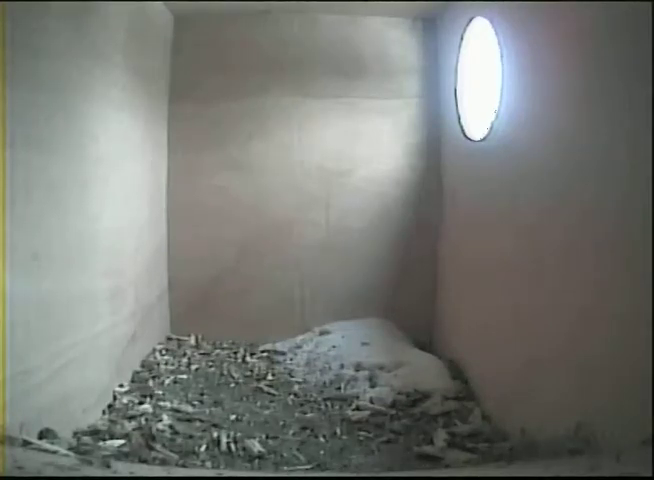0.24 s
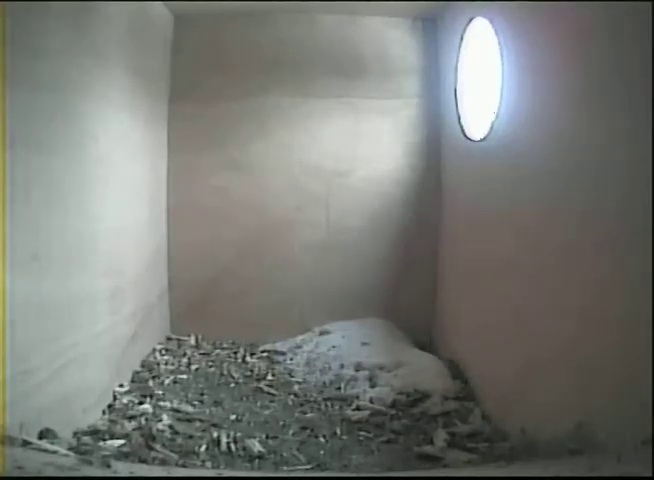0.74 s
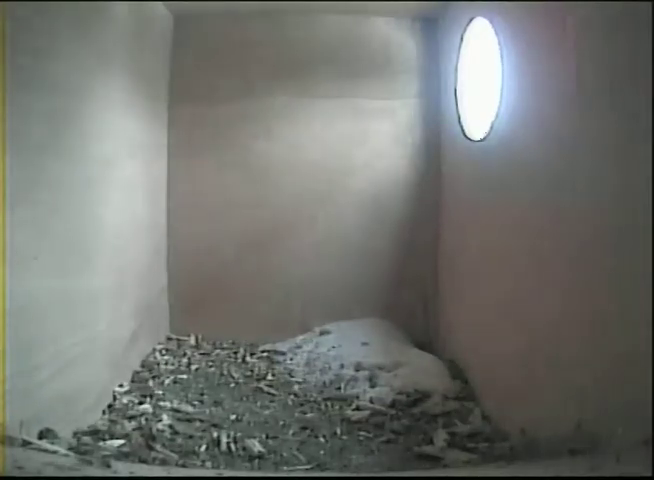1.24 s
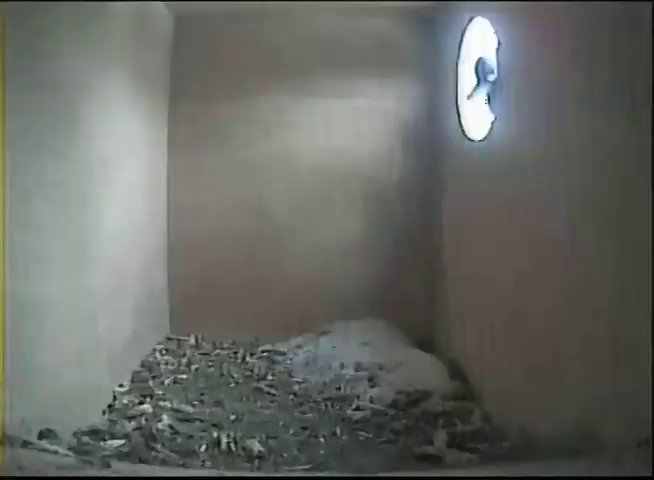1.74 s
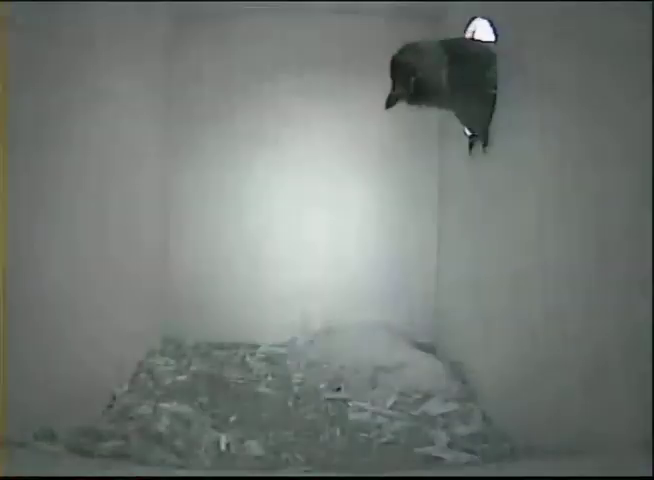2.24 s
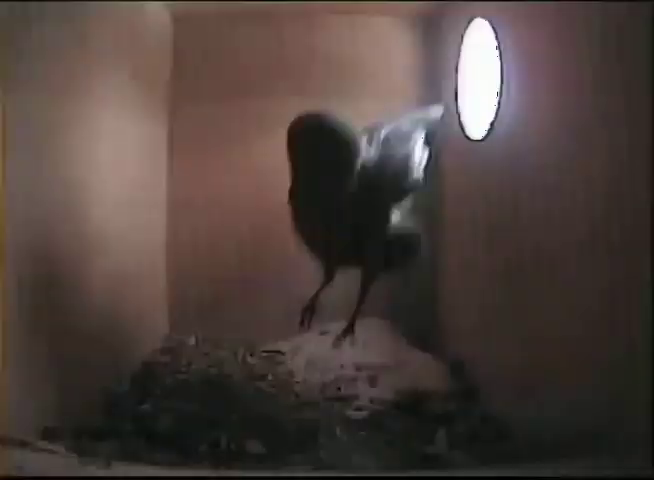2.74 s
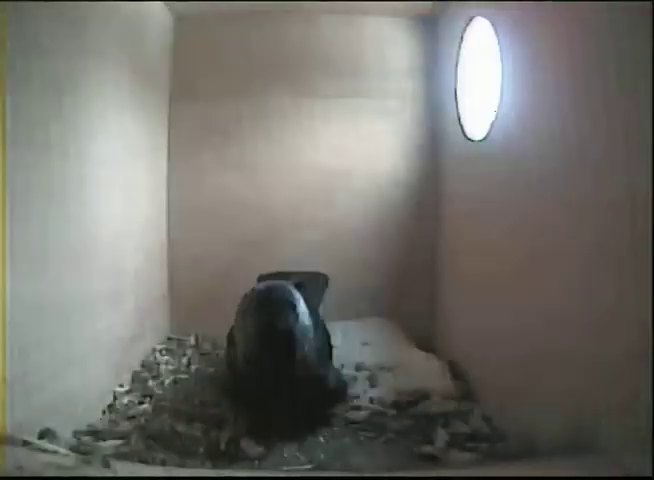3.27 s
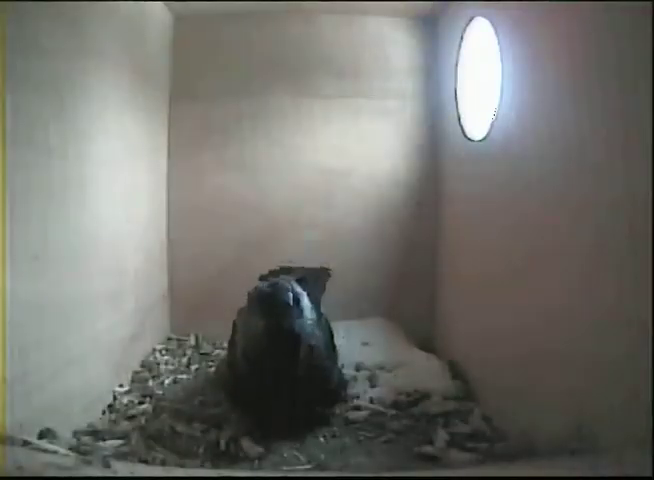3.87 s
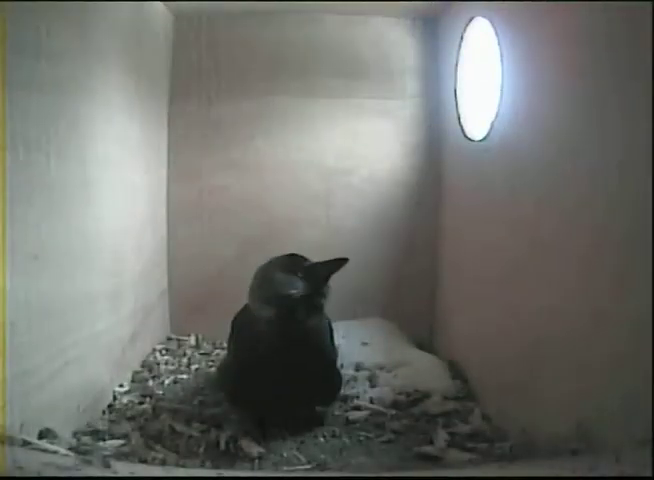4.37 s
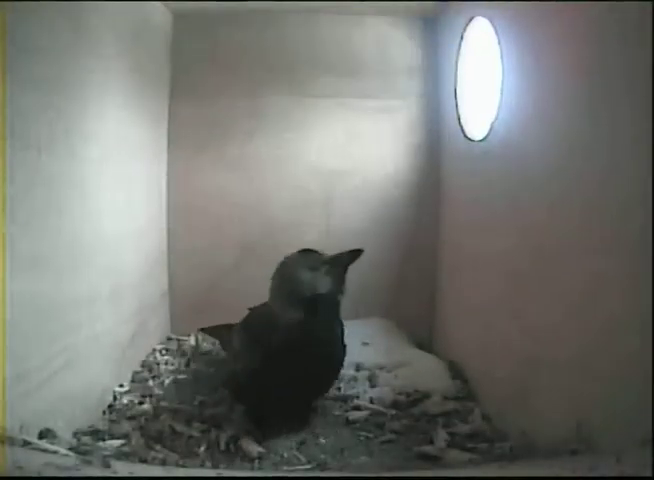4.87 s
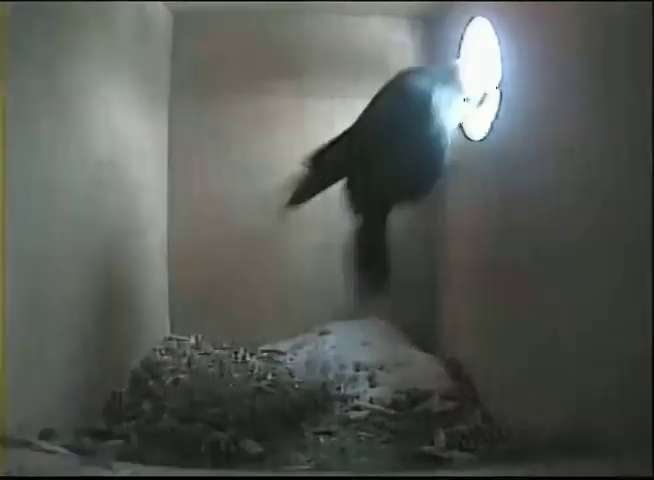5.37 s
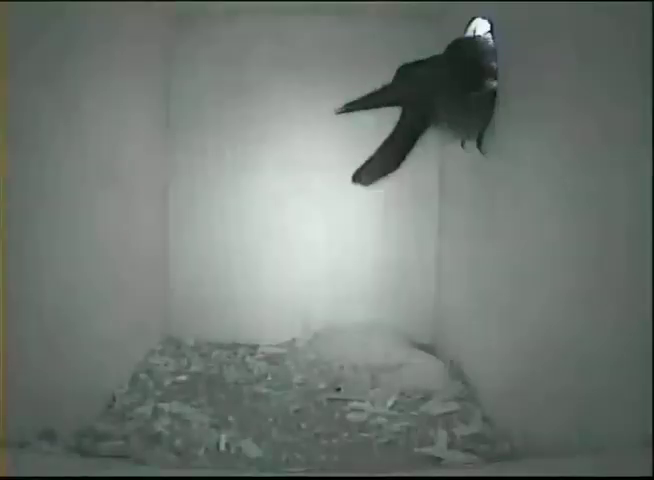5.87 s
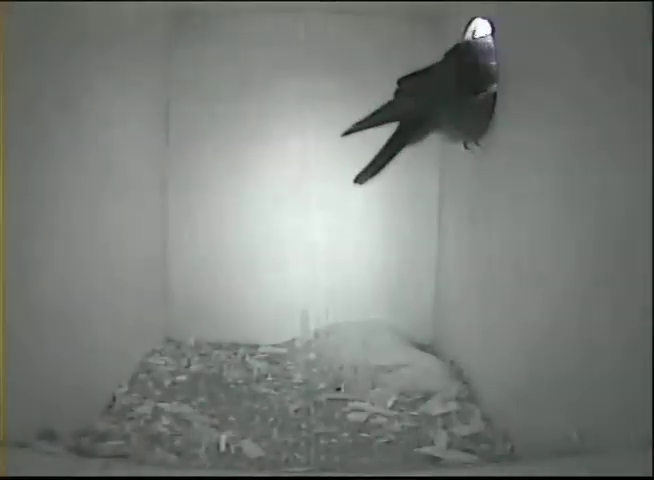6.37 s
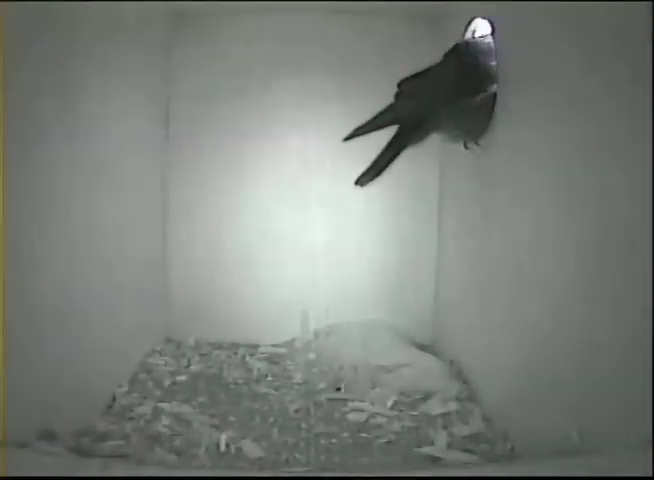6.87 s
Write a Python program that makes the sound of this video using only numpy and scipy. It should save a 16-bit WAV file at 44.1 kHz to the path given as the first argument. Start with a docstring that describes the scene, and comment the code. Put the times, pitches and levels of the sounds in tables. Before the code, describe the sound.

Heard up close from inside a small wooden nest box, a single sharp jackdaw call comes from outside. Claws scratch and tap on the wood as the bird squeezes in and lands with a soft thud. The sound cuts out briefly, then dry litter crackles and the boards knock more loudly. A short flap and scrabble lead to one harsh call and two softer ones, above a faint low rumble.

```python
"""A jackdaw at a wooden nest box, heard from inside. Over faint hiss and hum, a draught makes the box
boom like a bottle. The bird gives one sharp call outside, then claws through the hole, knocking the
boards and brushing the walls. It drops onto the litter with a jolt of air and shuffles about; the
sound cuts out for half a second. It flaps back up to the hole and calls three more times, once
harshly and twice softly."""
import sys
import numpy as np
from scipy import signal
from scipy.fft import rfft, irfft, next_fast_len
from scipy.io import wavfile
from scipy.ndimage import uniform_filter1d, map_coordinates

SR = 44100
rng = np.random.default_rng(int(sys.argv[2]) if len(sys.argv) > 2 else 0)


def output_pcm(signal):
    """Save a mono or channel-first signal as 16-bit PCM at the path in sys.argv[1].

    Samples are clipped to [-1, 1] before scaling.
    """
    pcm = np.clip(np.atleast_2d(signal).T, -1, 1) * 32767
    wavfile.write(sys.argv[1], SR, np.round(pcm).astype(np.int16))


N = 313551
TIME = np.arange(N) / SR


def amp(db):
    """Decibels to gain."""
    return 10 ** (np.asarray(db) / 20)


def unit(x):
    """Scale to rms 1."""
    return x / np.sqrt(np.mean(x ** 2) + 1e-20)


def crest(x):
    """Scale the loudest few milliseconds to rms 1."""
    return x / np.sqrt(uniform_filter1d(x ** 2, size=300).max() + 1e-20)


def along(points, hz):
    """Read (Hz, value) points on a log axis."""
    f, v = np.transpose(points)
    return np.interp(np.log(hz + 1), np.log(f + 1), v)


def curves(rows, t=TIME):
    """Breakpoint envelopes, one for each column after the time."""
    s, *cols = np.transpose(rows)
    return [np.interp(t, s, c) for c in cols]


def wobble(rate, size=N):
    """Smooth random modulation, rate knots a second."""
    knots = rng.standard_normal(int(size * rate / SR) + 4)
    return map_coordinates(knots, [np.arange(size) * rate / SR])


def grains(rate, spread_db, size=N):
    """Tiny random snaps, rate a second, of rms 1."""
    chance, sign, strength = rng.random(size), rng.standard_normal(size), rng.standard_normal(size)
    return unit((chance < rate / SR) * sign * amp(spread_db * np.clip(strength, -2, 2)))


def add(track, s, x):
    """Mix x into the track at time s."""
    part = track[round(s * SR):][:len(x)]
    part += x[:len(part)]


def eq(x, spectrum):
    """Minimum-phase EQ through (Hz, dB) points."""
    m = 2 * next_fast_len(len(x) // 2 + 2048)
    cepstrum = irfft(np.log(amp(along(spectrum, np.fft.rfftfreq(m, 1 / SR)))), m)
    cepstrum[1:m // 2] *= 2
    cepstrum[m // 2 + 1:] = 0
    return irfft(rfft(x, m) * np.exp(rfft(cepstrum)), m)[:len(x)]


def resonate(x, modes):
    """Ring x through (Hz, width Hz, dB) resonators."""
    m = next_fast_len(len(x) + SR // 4)
    f = np.fft.rfftfreq(m, 1 / SR)
    gain = sum((-1) ** k * amp(db) * 1j * f * width / (hz * hz - f * f + 1j * f * width)
               for k, (hz, width, db) in enumerate(modes))
    return irfft(rfft(x, m) * gain, m)[:len(x)]


# mains partials: (frequency [Hz], level [dB])
MAINS_HUM = [(50, -68), (150.4, -87.5), (250.5, -96.5), (350.7, -101)]
# hiss colour: (frequency [Hz], gain [dB])
HISS_EQ = [(40, 1.5), (100, -9), (180, -14), (400, -21), (800, -19.5), (1500, -26.5), (3000, -28.5),
           (6800, -28.5), (7700, -32), (8600, -43.5)]
def room_tone(hiss_db, air_db):
    """The bed: mains hum, outdoor air sounding in the box and microphone hiss."""
    hum = sum(np.sqrt(2) * amp(db) * np.sin(2 * np.pi * hz * TIME) for hz, db in MAINS_HUM)
    swell = amp(air_db + 1.7 * wobble(6.1))
    air = unit(resonate(rng.standard_normal(N), [(253, 31, 0.98), (412, 19, -3.2), (475, 25, -2)]))
    return hum + swell * air + amp(hiss_db) * unit(eq(rng.standard_normal(N), HISS_EQ))


OPEN_HOLE_HZ, BLOCKED_HOLE_HZ = 54, 45
# the bird's body closing the hole: (time [s], share closed [0-1])
HOLE_BLOCKED = [(1.6, 0.01), (1.85, 0.99), (2.55, 1), (2.7, 0.07), (5.25, 0.08), (5.55, 0.98)]
def bottle_boom(swing_db, draught_db):
    """Draught stirs the bottle resonance of box and hole; a bird in the hole lowers and damps it."""
    blocked = np.clip(curves(HOLE_BLOCKED)[0], 0, 1)
    free = unit(resonate(rng.standard_normal(N), [(OPEN_HOLE_HZ, 10, 0)]))
    damped = unit(resonate(rng.standard_normal(N), [(BLOCKED_HOLE_HZ, 12, 0)]))
    boom = amp(swing_db + 1.5 * wobble(2.2)) * ((1 - blocked) * free + blocked * damped)
    rumble_eq = [(5, -12.5), (15, 1.0), (40, -11), (70, -28.5), (150, -47.5), (500, -90.5)]
    draught = unit(eq(rng.standard_normal(N), rumble_eq))
    gusts = amp(draught_db + 1.5 * wobble(3.7))
    return eq(boom + gusts * draught, [(58, 3.0), (75, -8.5), (200, -24.5)])


# decay of the air in the box: (frequency [Hz], t60 [s])
REVERB_DECAY = [(300, 0.5), (700, .13), (1100, 0.1), (2000, 0.18), (3500, 0.12), (8000, 0.15)]
def box_reverb(x, wet_db):
    """The dry sound plus dense echoes off the close walls, with 2 ms of pre-delay."""
    hz, t, noise = signal.stft(rng.standard_normal(SR // 4), SR, nperseg=256)
    tail = signal.istft(noise * amp(-60 * t / along(REVERB_DECAY, hz)[:, None]), SR, nperseg=256)[1]
    echo = signal.fftconvolve(np.pad(x, (SR // 500, 0)), tail / np.linalg.norm(tail))[:len(x)]
    return (x + amp(wet_db) * echo) / np.hypot(1, amp(wet_db))


# turbulence in the voice: (frequency [Hz], gain [dB])
RASP_EQ = [(600, -15.5), (2000, -4.5), (4000, 6.5), (8000, 2)]
def call(contour, throat, jitter, split, rasp_db, wet_db=-10):
    """A falling harmonic tone; when rough, it splits into thirds of its pitch and turns noisy."""
    start, end = contour[0][0], contour[-1][0]
    t = start + np.arange(SR // 5) / SR
    pitch, db, rough = curves(contour, t)
    pitch *= 1 + jitter * rough * wobble(1200, len(t))
    phase = 2 * np.pi * np.cumsum(pitch) / SR
    k = np.arange(2, 31)[:, None]
    multiple = k / 3
    side_tones = split * rough * np.array([wobble(110, len(t)) for _ in k])
    gains = amp(along(throat, multiple * pitch)) * np.where(multiple % 1 == 0, 1, side_tones)
    tone = np.sqrt(2) * (gains * np.sin(multiple * phase + k ** 2)).sum(0) / np.linalg.norm(gains, axis=0)
    breath = rng.standard_normal(len(t)) * (1 + np.cos(phase))
    rasp = eq(unit(eq(breath, throat)), RASP_EQ)
    gate = np.clip(np.minimum(t - start, end - t) * 400, 0, 1)
    voice = (tone + amp(rasp_db) * rough * rasp) * amp(db) * gate
    out = np.zeros(N)
    add(out, start, box_reverb(np.pad(voice, (0, SR // 10)), wet_db))
    return out


# call contours: (time [s], pitch [Hz], level [dB], roughness [0-1])
SHARP_TCHAK = [(.352, 1230, -60, .1), (.358, 1195, -31, 0.12), (.368, 1159, -35.5, 0.25),
               (.383, 1077, -28.5, 0.2), (.396, 1008, -38.5, 0.4), (.407, 996, -37.5, 0),
               (.424, 880, -45, 0.4), (.438, 785, -66.5, .4)]
HARSH_RASP = [(5.766, 1595, -63, 0.3), (5.774, 1465, -51.5, 0), (5.784, 1476, -40, 0),
              (5.795, 1253, -41.5, .2), (5.804, 1121, -40, 0.95), (5.830, 1118, -46, 1),
              (5.848, 1019, -45.5, 0.28), (5.874, 921, -54.5, 0.86), (5.884, 870, -51, 0.71)]
SOFT_KYOW = [(5.931, 1050, -65, 0.1), (5.939, 1016, -44, 0.25), (5.958, 1007, -42.5, 0.3),
             (5.970, 884, -45.5, 0.98), (5.982, 765, -56.5, 1), (5.996, 660, -54.5, 0.9)]
SOFT_KYA = [(6.023, 870, -60.5, 0.095), (6.031, 892, -46.5, 0.33), (6.043, 919, -53, 0.092),
            (6.057, 881, -44, 0.2), (6.070, 863, -63.5, 0.39), (6.082, 830, -49, 0.4)]
# throat formants for each beak opening: (frequency [Hz], gain [dB])
BEAK_WIDE = [(400, -45.5), (800, -3), (1000, 1.5), (1250, -2), (1600, -5.5), (2150, -4), (2500, -6),
             (2760, -20), (2950, -11.5), (3350, -10), (3800, -23.5), (5200, -26.5), (7000, -28),
             (8500, -39)]
BEAK_STRAINED = [(400, 6), (800, -6.5), (1100, 6.5), (1500, -0.5), (1850, 1), (2250, 6.5), (3050, -6),
                 (3650, -21.5), (4300, -26.5), (5200, -27), (6200, -12), (7200, -13.5), (7700, -54),
                 (8500, -32)]
BEAK_NARROW = [(500, -3.5), (1000, -2.5), (2000, -19.5), (3050, -27.5), (3600, -43), (6000, -54),
               (8500, -70)]
BEAK_HALF_OPEN = [(500, 0), (900, -5), (1800, -15.5), (2700, -27.5), (3500, -44), (8500, -67)]
# air modes that a call wakes: (frequency [Hz], width [Hz], gain [dB])
STANDING_WAVES = [(930, 26, -8), (1900, 20, -1), (2080, 13, 4), (2080, 26, -4.5), (2945, 15, -0.5),
                  (3345, 24, 0), (3820, 26, 0)]
def jackdaw_calls(standing_db):
    """One sharp call from outside the hole, then a harsh one and two soft ones from the perch."""
    voice = call(SHARP_TCHAK, BEAK_WIDE, jitter=0.036, split=0.062, rasp_db=0.5, wet_db=-4)
    voice += call(HARSH_RASP, BEAK_STRAINED, jitter=0.055, split=1.7, rasp_db=-1)
    voice += call(SOFT_KYOW, BEAK_NARROW, jitter=0.046, split=0.086, rasp_db=-1.5)
    voice += call(SOFT_KYA, BEAK_HALF_OPEN, jitter=0.035, split=0.23, rasp_db=2.5)
    return voice + amp(standing_db) * resonate(voice, STANDING_WAVES)


# the boards' modes, shared with the knocks: (frequency [Hz], width [Hz], gain [dB])
FLOOR_THUD = [(95, 20, -21.5), (201.2, 8, -9), (219.6, 34, -10), (255.5, 16, 1.5), (347, 35, -16)]
PANEL_RING = [(385.3, 21, -10.5), (460.5, 21.6, 3), (494.7, 31, -8), (510, 39, -27.5)]
HOLLOW_NOTE = [(616.7, 26.8, -3.5), (659, 38, -12.5), (778.7, 26, -12)]
# colours of dry litter, claw on wood and bright rustle: (frequency [Hz], gain [dB])
LITTER_EQ = [(500, -17), (950, 10.5), (1200, -2), (1380, 3.5), (1650, 0.5), (1950, -13.5), (2700, -12),
             (3500, -22), (6000, -31)]
CLAW_EQ = [(500, -11), (1100, 3), (1800, -1), (2200, -3.5), (2700, -6.5), (3150, -15.5), (3700, -12.5),
           (8000, -62)]
BRIGHT_EQ = [(1500, -31.5), (3300, -1.5), (4100, -3), (4600, -4), (5200, -3), (6800, -7.5), (7500, -13.5),
             (8600, -19)]
# bouts of footwork: (start [s], end [s], effort [dB])
SHUFFLE_BOUTS = [(1.133, 1.388, -76.5), (1.597, 1.849, -69.5), (1.912, 2.24, -70.5), (2.317, 2.582, -62),
                 (2.858, 3.015, -67.5), (3.163, 3.33, -72), (3.845, 4.146, -72.5), (4.384, 4.53, -65),
                 (4.652, 5.014, -59), (5.077, 5.335, -68.5), (5.523, 5.784, -68.5), (6.113, 6.496, -81.5),
                 (7.051, 7.11, -72)]
def shuffling(boards_db, litter_db, claws_db, feathers_db, unsteady_db):
    """Small steps rumble the boards and rustle feathers; litter crackles below, claws tick on the wall."""
    attack_s, release_s, ticks_per_s = 0.024, 0.085, 45
    effort = sum(amp(db) * np.interp(TIME, [start - attack_s, start, end, end + release_s], [0, 1, 1, 0])
                 for start, end, db in SHUFFLE_BOUTS)
    on_floor = (TIME > 2.7) & (TIME < 5.4)
    steps = grains(700, 2.4)

    def damped(modes):
        """The bird's weight damps the boards, widening each mode."""
        return unit(resonate(steps, [(hz, 1.35 * width, db) for hz, width, db in modes]))

    weight, boards = amp(np.where(on_floor, 1.5, -4)), amp(boards_db)
    thrum = weight * damped(FLOOR_THUD) + boards * damped(PANEL_RING + HOLLOW_NOTE)
    thrum /= np.hypot(weight, boards)
    crackle = amp(litter_db) * unit(box_reverb(eq(grains(1500, 4.5), LITTER_EQ), wet_db=1))
    slips = (rng.random(N) < ticks_per_s / SR) * rng.uniform(.2, 1, N)
    ticks = amp(claws_db) * unit(box_reverb(eq(slips, CLAW_EQ), wet_db=2))
    rustle = amp(feathers_db) * unit(box_reverb(eq(grains(2500, 5.9), BRIGHT_EQ), wet_db=1.5))
    texture = np.where(on_floor, crackle, ticks) + rustle
    return effort * sum(layer * amp(unsteady_db * wobble(35)) for layer in (thrum, texture))


# claws catching on the wood: (time [s], level [dB])
CLAW_CATCHES = [(1.2586, -71.5), (1.523, -74.5), (1.605, -77), (1.656, -87), (1.727, -57.5), (1.758, -56.5),
                (1.956, -74), (1.9785, -65.5), (2.0007, -74), (2.295, -65.5), (2.376, -67.5),
                (2.4152, -69.5), (2.4758, -53.5), (2.537, -51.5), (2.5548, -63), (2.59, -59), (2.7937, -61),
                (2.844, -58), (2.969, -77), (4.049, -66.5), (4.505, -62.5), (4.5619, -44.5), (4.5718, -40),
                (4.5866, -38), (5.0436, -67.5), (5.447, -46.5), (5.464, -55.5), (5.657, -64),
                (5.7228, -67.5)]
def scratches(claw_db, treble_db, snap, scatter_t60_s):
    """A claw catches with a sharp transient, then a scatter of smaller contacts."""
    out, t = np.zeros(N), np.arange(SR // 5) / SR
    for s, db in CLAW_CATCHES:
        tick = snap * rng.standard_normal(len(t)) * np.exp(-t / 0.00046)
        scatter = grains(3400, 6.3, len(t)) * amp(-60 * t / scatter_t60_s)
        contact = box_reverb(tick + scatter, wet_db=-7)
        claw, treble = crest(eq(contact, CLAW_EQ)), crest(eq(contact, BRIGHT_EQ))
        add(out, s, amp(db) * (amp(claw_db) * claw + amp(treble_db) * treble))
    return out


# higher panel modes: (frequency [Hz], width [Hz], gain [dB])
UPPER_RING = [(975, 67, 4.5), (1103, 58, -9), (1066, 63, -2), (1390, 31, 4.5), (1607, 98, 2.5),
              (1687, 57, -5.5), (2676, 97, -7.5), (2995, 51, -2.5)]
# feet and body hitting the boards: (time [s], level [dB], weight [dB], skid t60 [s])
BOARD_HITS = [(1.265, -48, -7, 0.075), (1.524, -57, 0, 0.076), (1.568, -56.5, -12.5, 0.037),
              (1.653, -57, 7, 0.052), (1.735, -48.5, -7, .06), (1.765, -48.5, -9.5, 0.091),
              (2.006, -48, -5, 0.074), (2.423, -54, -16.5, 0.18), (2.487, -53.5, -6, 0.26),
              (2.535, -50, -12.5, 0.045), (2.807, -47, 5.5, .05), (2.828, -47, 5, 0.13),
              (2.967, -54.5, 2, .05), (3.012, -63.5, 8.5, 0.064), (3.218, -70, 17, 0.07),
              (4.009, -63.5, 8.5, 0.067), (4.053, -51.5, 2.5, 0.14), (4.201, -55.5, -7, 0.12),
              (4.442, -51, -4, 0.087), (4.506, -41.5, -13, 0.1), (4.566, -33, -2.5, 0.095),
              (4.606, -36, 0.5, 0.016), (4.621, -37, 3, 0.03), (4.751, -47, 2, 0.06),
              (4.79, -50, -0.5, 0.13), (4.877, -50.5, 7.5, 0.14), (5.046, -49, -12, .06),
              (5.25, -67.5, 16, 0.047), (5.453, -40.5, -18, 0.062), (5.472, -42.5, -1, 0.06),
              (5.5, -47, -0.5, 0.18), (6.046, -55, 2, 0.076)]
def knocks(thud_db, panel_db, hollow_db, upper_db, blow, attack_s):
    """Each hit lands, skids and rings the boards; more weight brings more floor thud."""
    out, t = np.zeros(N), np.arange(SR // 4) / SR
    for s, db, weight_db, t60 in BOARD_HITS:
        skid = rng.standard_normal(len(t)) * amp(-60 * t / t60) * (1 - np.exp(-t / attack_s))
        force = skid / np.linalg.norm(skid) + blow * signal.unit_impulse(len(t))
        lift_db = 0.35 * weight_db
        damping_db = 110 * t60  # a longer slide damps the hollow note
        layers = [(FLOOR_THUD, thud_db + weight_db), (PANEL_RING, panel_db),
                  (HOLLOW_NOTE, hollow_db + lift_db - damping_db), (UPPER_RING, upper_db + lift_db)]
        knock = sum(amp(db + level) * crest(resonate(force, modes)) for modes, level in layers)
        add(out, s - attack_s, knock)
    return eq(out, [(60, 0.5), (100, 2.5), (1700, -10.5), (3000, -14), (8000, -18)])


# one claw tick, then feather sweeps: (peak time [s], rise [s], fall [s], level [dB])
BRIGHT_RUSTLES = [(1.727, .002, 0.058, -68.5), (2.107, .02, .06, -80), (2.4, 0.037, 0.16, -87),
                  (2.55, .1, 0.3, -81.5), (2.8, 0.016, 0.034, -58), (2.847, .008, 0.053, -71),
                  (4.59, 0.075, 0.056, -66.5), (4.739, 0.3, 0.56, -85.5), (4.876, 0.013, 0.012, -75),
                  (5.305, .06, 0.15, -77), (5.601, 0.24, 0.194, -88.5)]
def bright_rustles(flutter_db):
    """A sharp claw tick at 1.727 s, then feathers brushing the wood in grainy swells."""
    envelope = sum(amp(db) * np.interp(TIME, [s - rise, s, s + fall], [0, 1, 0]) ** 1.4
                   for s, rise, fall, db in BRIGHT_RUSTLES)
    flutter = amp(flutter_db * wobble(60))
    return envelope * flutter * unit(box_reverb(eq(grains(3700, 11), BRIGHT_EQ), wet_db=10.5))


# pushes of air: (time [s], level [dB])
WING_PUFFS = [(1.744, -47), (1.985, -44.5), (5.451, -44.5), (5.522, -50.5), (5.915, -43)]
def wing_puffs(hz):
    """Wings and body shove the air: one sub-bass swing each."""
    out = np.zeros(N)
    cycles = (np.arange(SR) / SR - .5) * hz
    puff = -np.sin(2 * np.pi * cycles) * np.exp(-2 * cycles ** 2)
    for s, db in WING_PUFFS:
        add(out, s - .5, amp(db) * puff)
    return out


# sudden moves: (time [s], level [dB], length [s])
AIR_JOLTS = [(2.664, -47.5, 0.3), (2.807, -55, 0.78), (4.623, -41.5, .6)]
def air_jolts():
    """A sudden move sets the air swinging at the box's bottle note."""
    out, t = np.zeros(N), np.arange(SR) / SR
    for s, db, length in AIR_JOLTS:
        fade = np.clip(1 - t / length, 0, 1) * (1 - np.exp(-t / 0.0043))
        add(out, s, amp(db) * fade * np.sin(2 * np.pi * OPEN_HOLE_HZ * t))
    return out


def scene():
    """The mono mix inside the box."""
    foley = scratches(claw_db=-4, treble_db=-20, snap=2.25, scatter_t60_s=0.08)
    foley += knocks(thud_db=-2, panel_db=-3, hollow_db=2.5, upper_db=-8.5, blow=0.45, attack_s=0.00398)
    foley += shuffling(boards_db=-4.5, litter_db=-11.5, claws_db=-13.5, feathers_db=-28.5, unsteady_db=2.5)
    foley += bright_rustles(flutter_db=3)
    low_end = bottle_boom(swing_db=-68, draught_db=-66.5) + wing_puffs(hz=27.8) + air_jolts()
    voice = jackdaw_calls(standing_db=-0.5)
    return (room_tone(hiss_db=-79.5, air_db=-83.5) + low_end + voice + foley)[None]


def record(dry):
    """The sound cuts out once; the top end is shelved down, then cut off."""
    mute_start_s, mute_end_s, cutoff_hz = 3.331, 3.848, 8650
    live = (TIME < mute_start_s) | (TIME > mute_end_s)
    hz = np.fft.rfftfreq(N, 1 / SR)
    shelf = amp(along([(7300, 1.5), (7900, -10.5), (8600, -7.0)], hz))
    return irfft(rfft(dry * live) * shelf * (hz < cutoff_hz), N)


dry = scene()
out = record(dry)
output_pcm(out)
```